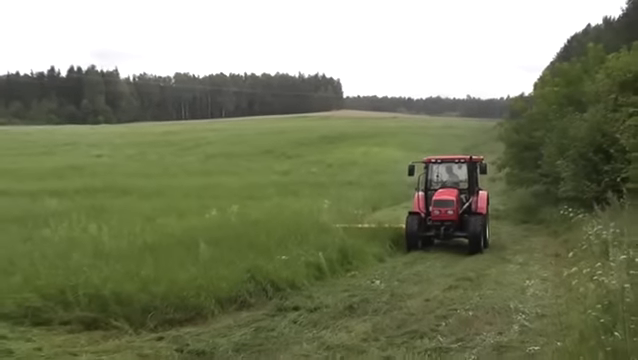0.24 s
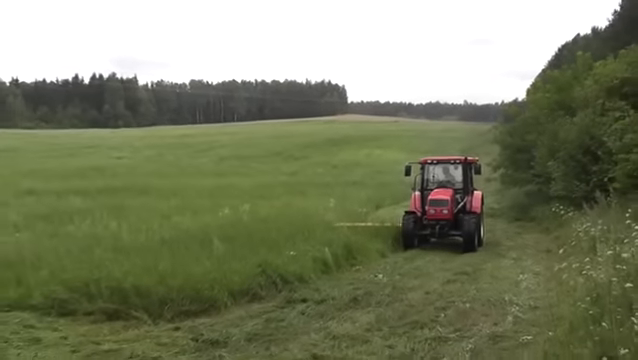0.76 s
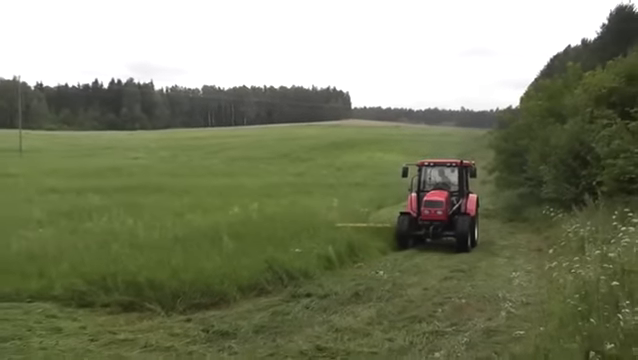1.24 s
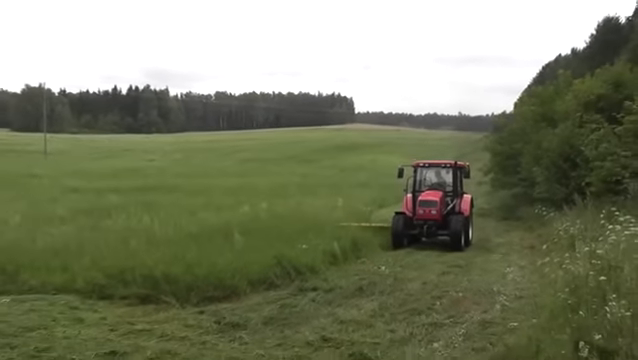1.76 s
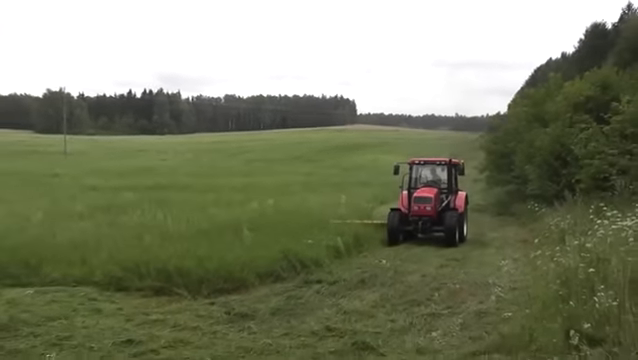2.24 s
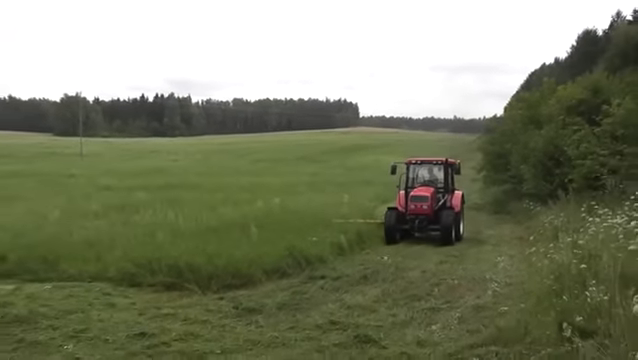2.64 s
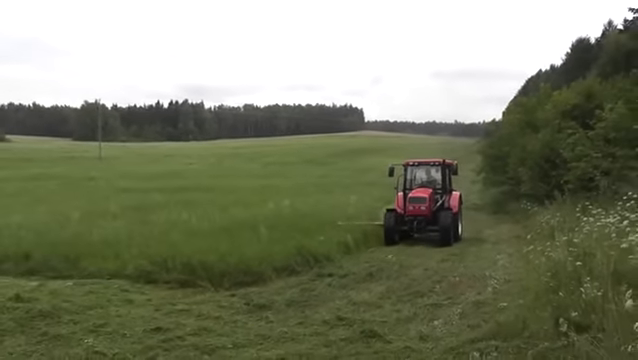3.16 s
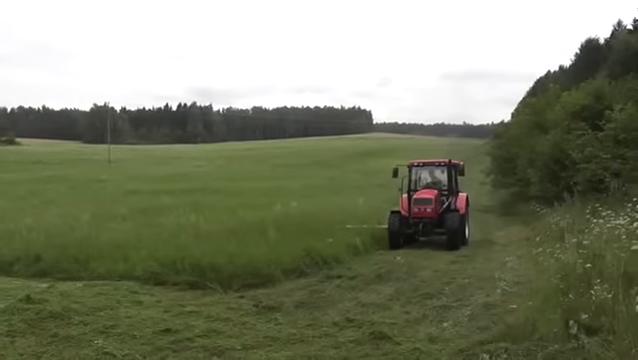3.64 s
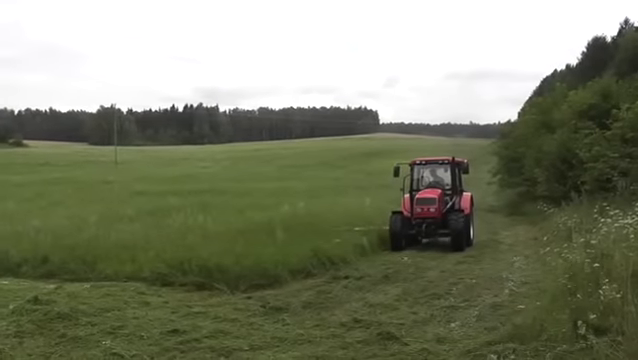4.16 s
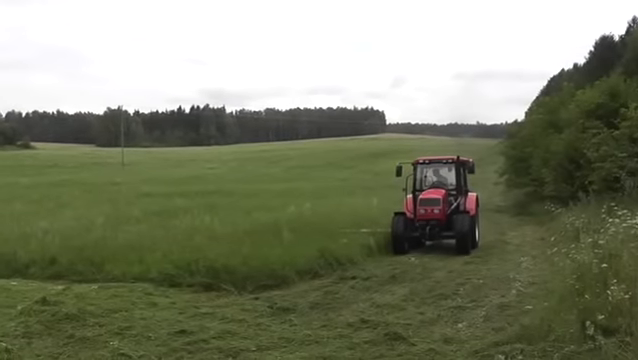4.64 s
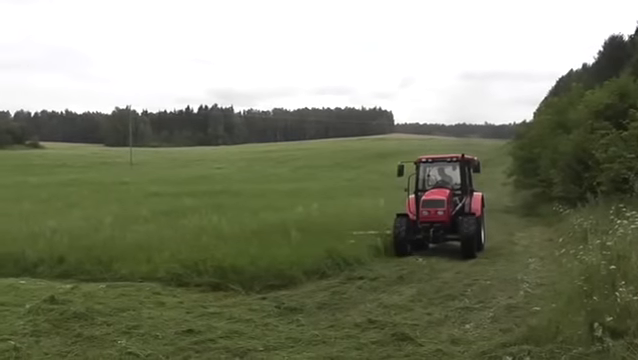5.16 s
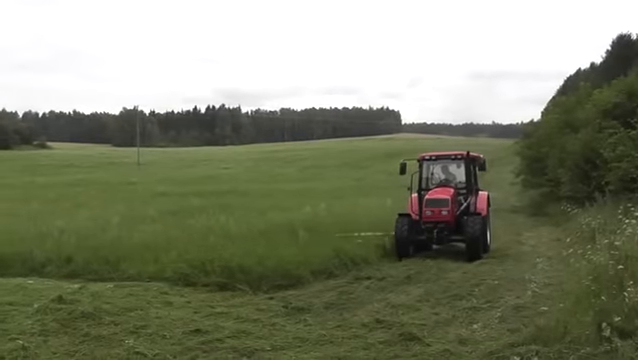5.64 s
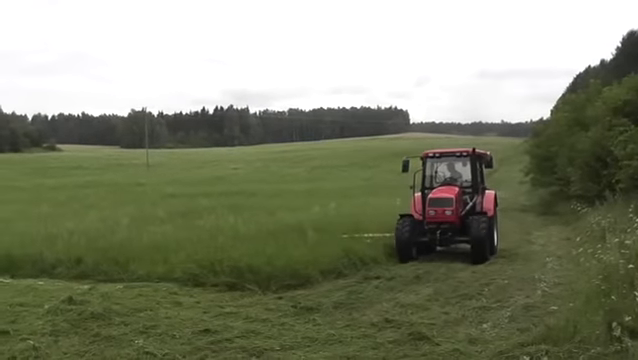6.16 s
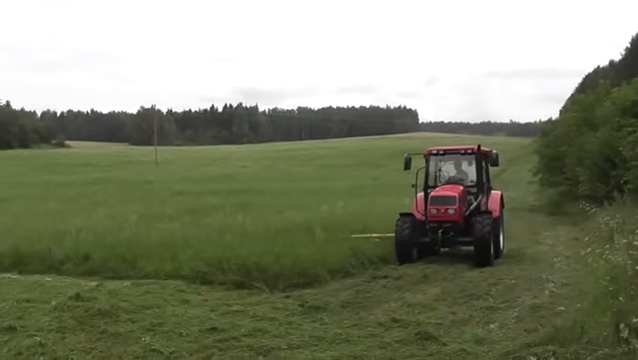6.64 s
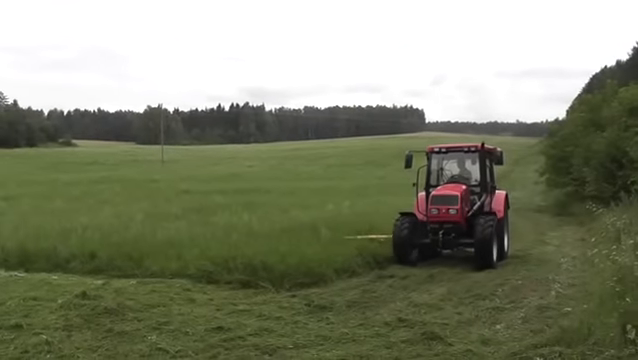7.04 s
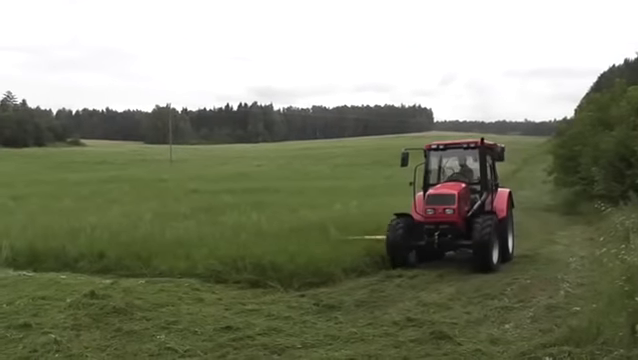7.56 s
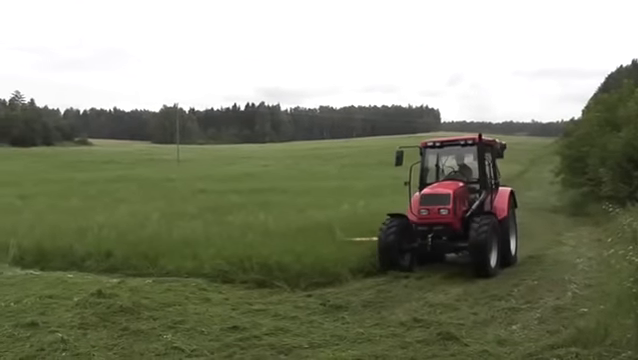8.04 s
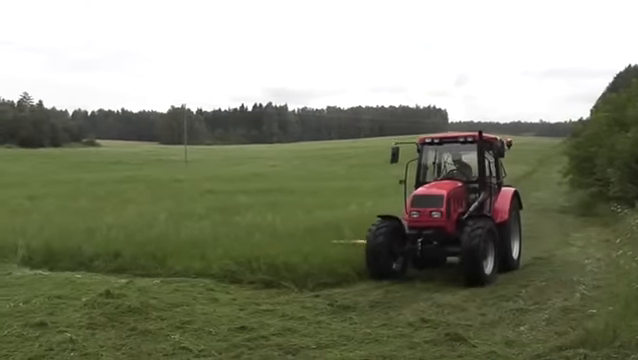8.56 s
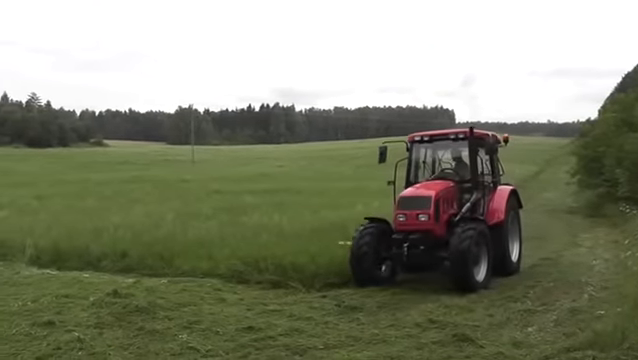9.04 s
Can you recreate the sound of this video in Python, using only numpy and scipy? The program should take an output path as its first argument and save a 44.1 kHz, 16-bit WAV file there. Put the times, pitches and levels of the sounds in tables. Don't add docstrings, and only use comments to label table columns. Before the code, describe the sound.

Continuous farm machinery outdoors: a humming, buzzing mower whine with coarse airy hiss, plus a four-cylinder diesel's exhaust drone, rattling knock and fine high belt chirps. The tractor comes from moderate distance to close by; the hiss swells mid-way then thins, while engine clatter and low roar grow. One soft rising note passes just before six seconds. Single open-air microphone, no echo, gently overloaded.

```python
import sys
import numpy as np
from scipy import signal
from scipy.fft import rfft, irfft
from scipy.io import wavfile

SR = 44100
rng = np.random.default_rng(int(sys.argv[2]) if len(sys.argv) > 2 else 0)


def wav_out(sig):
    wavfile.write(sys.argv[1], SR, np.round(np.clip(np.atleast_2d(sig).T, -1, 1) * 32767).astype(np.int16))


def elevation(decibels):
    levels = np.asarray(decibels, float)
    return 10 ** (levels / 20)


N = 410123
TIME = np.arange(N) / SR


def rms_one(x):
    return x / np.sqrt(np.mean(x ** 2) + 1e-20)


def in_time(rows):
    s, *columns = np.transpose(rows)
    return [np.interp(TIME, s, c) for c in columns]


def at_hz(points, hz):
    point_hz, point_db = np.array(points).T
    return np.interp(np.log(hz), np.log(point_hz), point_db)


def drift(rate_hz):
    pole = np.exp(-80 * np.pi * rate_hz / SR)
    white = rng.standard_normal(N // 40 + 2002)
    slow = signal.lfilter([1], [1, -2 * pole, pole * pole], white)[2000:]
    return np.interp(np.arange(N) / 40, np.arange(len(slow)), rms_one(slow - slow.mean()))


def band(x, low_hz, high_hz, order=2):
    return signal.sosfilt(signal.butter(order, [low_hz, high_hz], "band", fs=SR, output="sos"), x)


def coloured(spectrum, dips=()):
    hz = np.maximum(np.fft.rfftfreq(N + 1, 1 / SR), 1)
    inside = (hz > .8 * spectrum[0][0]) & (hz < 1.05 * spectrum[-1][0])
    db = at_hz(spectrum, hz)
    for centre_hz, half_width_hz, depth_db in dips:
        db = db + depth_db * np.exp(-((hz - centre_hz) / half_width_hz) ** 2)
    return rms_one(irfft(rfft(rng.standard_normal(N + 1)) * elevation(db) * inside, N + 1)[:N])


def tone(turns, level_db):
    return np.sqrt(2) * elevation(level_db) * np.cos(2 * np.pi * turns)


# start_s, level_db [dB rms]
WHINE = [(0.0, -14), (0.07, -14.5), (3.0, -16), (3.21, -18), (3.83, -14.5), (4.32, -19.5), (4.82, -15.5),
         (4.9, -18), (5.49, -13.5), (6.19, -17), (6.29, -13), (6.35, -16.5), (7.35, -13), (7.85, -18),
         (8.34, -16), (8.42, -18.5), (9.17, -17), (9.3, -22)]
# multiple [of the pass rate], far_db, near_db [dB rms]
BLADE_HARMONICS = [(3, -51, -41), (4, -38, -36.5), (5, -59, -29.5), (6, -43, -44.5), (7, -53, -38),
                   (8, -42.0, -44), (9, -41, -51), (10, -39, -47), (11, -41.5, -46.5), (12, -40, -45.5),
                   (13, -55, -48), (14, -38.5, -56), (15, -36.5, -45), (16, -45.5, -37.5), (17, -45, -33.5),
                   (18, -43, -45.5), (19, -42, -55), (20, -46, -50.5), (21, -42.0, -58.5), (22, -43.5, -40),
                   (23, -47.5, -45.5), (24, -48.5, -52), (25, -39, -49.5), (26, -44, -51.5),
                   (27, -41.5, -56.0), (28, -54.5, -53.5), (29, -55.5, -56), (30, -51.5, -54.5),
                   (31, -39, -58), (32, -47, -46.5)]
# centre_s, multiple, half_width_s, gain_db
SWELLS = [(0.4, 6.0, 0.43, 9), (0.7, 17.0, 1.05, 6), (1.0, 36, 1.6, 5.5), (1.5, 5.0, 0.41, 15.5),
          (1.5, 31, 1.9, -6), (2.0, 3.0, 1.6, 10.5), (3.2, 25.0, 1.13, 4.5), (3.3, 4.0, 1.1, 1.5),
          (3.5, 17.0, 0.39, 7), (3.5, 20.0, 2.6, 9.5), (3.6, 37, 1.8, 6.5), (4.2, 6.0, 1.2, 5),
          (4.2, 8.0, 2.3, 4.5), (4.2, 16.0, 1.23, 5.5), (4.4, 11.0, 0.33, 7), (4.6, 9.0, 2.4, 7),
          (4.8, 10.0, 0.92, 9), (5.3, 5.0, 0.71, 11), (5.7, 27.0, 2.5, 9.5), (6.1, 21.0, 2.4, 15),
          (6.3, 20.0, 0.71, 9.5), (6.4, 16.0, 1.3, 7.5), (6.6, 11.0, 0.66, 9.5), (6.6, 12.0, 0.74, 8),
          (6.9, 13.0, 1.87, 8.5), (7.1, 19.0, 0.82, 12.5), (7.6, 18.0, 0.22, 11.5), (8.6, 40, 1.0, 8),
          (9.0, 5.0, 0.32, 3.5), (9.1, 6.0, 1.27, 14.5)]


def blades(passes, pass_hz, bright_db):
    second_db, = in_time(WHINE)
    along = TIME / TIME[-1]
    first_db = -20.5 + 1.5 * along - .15 * (second_db - second_db.mean())
    flutter_db = 0.45 * drift(16)
    out = tone(passes + .4, first_db + flutter_db)
    out += tone(2 * passes + .41, second_db + flutter_db + .5 * drift(5))

    levels = {round(k): far_db + (near_db - far_db) * along for k, far_db, near_db in BLADE_HARMONICS}
    for k in range(33, 60):
        levels[k] = at_hz(HISS_FAR, k * pass_hz.mean()) - 43 + bright_db
    for centre_s, k, half_width_s, gain_db in SWELLS:
        levels[round(k)] = levels[round(k)] + gain_db * np.exp(-((TIME - centre_s) / half_width_s) ** 2)
    for k in range(3, 60):
        turns = k * (passes - .27) + 0.2 * drift(0.45) + 0.032 * drift(5)
        out += tone(turns, levels[k] + (.4 + .05 * k) * drift(.9) + 1.2 * drift(6))
    return out


# pitch_hz [Hz], density_db [dB per Hz]
HISS_FAR = [(560, -25.5), (950, -5.5), (1020, -8), (1160, -13), (1220, -6), (1390, -3), (1720, 0.5),
            (2010, -4), (2370, 2.5), (2820, -0.5), (3260, 1), (4450, -7), (6380, -4), (8210, -11.5),
            (9680, -30), (12600, -51.5), (21300, -120)]
HISS_TURN = [(560, -36.5), (950, -8.5), (1270, -8.5), (1680, -1.5), (2050, -3), (2460, 1.5), (3230, -2.5),
             (3660, -7), (4040, -6), (4410, -10), (6440, -6.5), (8130, -12), (9680, -31), (12600, -66),
             (21300, -120)]
HISS_NEAR = [(560, -37), (950, -0.5), (1110, -21.5), (1360, -2), (1800, -5.5), (2030, -4), (2440, 0.5),
             (4490, -11.5), (5460, -7), (6130, -6.5), (7090, -5.5), (8450, -12), (9680, -28),
             (12600, -61.5), (21300, -120)]
# pitch_hz, half_width_hz, depth_db
GROUND_DIPS = [(1980, 91, -4), (2840, 50, -5.5), (3630, 150, -3.5), (4430, 130, -3.5), (5200, 250, -3.5),
               (6900, 140, -6)]


def hiss(passes, hiss_db, bright_db, shares):
    strength = elevation(3.7 * rng.standard_normal(int(passes[-1]) + 2))[(passes + .23).astype(int)]
    puff = strength * np.cos(np.pi * (passes - .27)) ** 4
    noise = np.sqrt(shares[0] + shares[1]) * coloured(HISS_FAR, GROUND_DIPS)
    noise += np.sqrt(shares[2]) * coloured(HISS_TURN, GROUND_DIPS)
    noise += np.sqrt(shares[3]) * coloured(HISS_NEAR, GROUND_DIPS)
    top = signal.sosfilt(signal.butter(2, 6500, "high", fs=SR, output="sos"), noise)
    treble_gain = elevation(bright_db - 0.5 + .8 * drift(7.3)) * (1 + 0.62 * puff)
    level = elevation(hiss_db - 2.5 + 0.73 * drift(13) + 0.41 * drift(30))
    return level * (1 + 0.25 * puff) * (noise + (treble_gain - 1) * top)


# multiple [of the firing rate], level_db [dB rms]
FIRING_ORDERS = [(1, -40.5), (2, -28), (3, -30.5), (4, -47.5), (5, -45)]
# multiple [of the firing rate], level_db [dB rms]
UNEVEN_ORDERS = [(1.25, -60), (1.5, -53), (1.75, -52.5), (2.25, -54), (2.5, -51), (2.75, -43), (3.25, -49),
                 (3.5, -47), (3.75, -50), (4.25, -50.5), (4.5, -46), (4.75, -47.5), (5.25, -61),
                 (5.5, -56.5)]


def exhaust(firings):
    pulse = firings - .223
    out = np.zeros(N)
    for k, level_db in FIRING_ORDERS:
        out += tone(k * pulse + .08, level_db + .5 * drift(3))
    for k, level_db in UNEVEN_ORDERS:
        turns = k * firings + rng.random() + 0.043 * drift(.4)
        out += tone(turns, level_db + 0.5 * drift(2.0))
    return out


# place [0-1 of the cycle], level_db
KNOCKS = [(.178, -6.5), (.238, -5), (.44, 0), (.515, -11), (.55, -15), (.70, -10), (.755, -10.5),
          (.965, -9), (.008, -10.5)]
# start_s, ring_low_hz, ring_high_hz, ring_db, clatter_db
STAGES = [
    (1.5, 620, 880, -2.5, -14),
    (4.2, 610, 830, -2.5, -14),
    (6.6, 545, 760, -2.5, -14),
    (8.9, 540, 960, -5.5, -15),
]


def stage_shares():
    return [np.interp(TIME, [row[0] for row in STAGES], one) for one in np.eye(len(STAGES))]


def knock(firings, knock_db, shares):
    cycles = np.arange(int(firings[-1] / 4) + 1)
    clicks = np.full(N + 1, 1e-18)
    for place, level_db in KNOCKS:
        luck = rng.standard_normal((len(cycles), 2))
        at = np.searchsorted(firings / 4, cycles + place + .002 * luck[:, 0])
        clicks[at] -= elevation(level_db + .8 * luck[:, 1])
    clicks = clicks[:N]
    fade = np.exp(-1 / (0.0068 * SR))
    bursts = signal.lfilter([1], [1, -fade], np.abs(clicks) ** .5) * rng.standard_normal(N)

    ticks = np.exp(-((firings + .1) % 1) / .22) * rng.standard_normal(N)
    out = elevation(-16.5 + 7 * TIME / TIME[-1]) * rms_one(band(ticks, 1055, 1960))
    for share, (_, low_hz, high_hz, ring_db, clatter_db) in zip(shares, STAGES):
        out += share * elevation(ring_db) * rms_one(band(clicks, low_hz, high_hz, order=3))
        out += share * elevation(clatter_db) * rms_one(band(bursts, low_hz, high_hz))
    return elevation(knock_db) * out


# start_s, level_db [chirp]
BELT_SLIP = [(0, -36), (.5, -42), (1.2, -33), (2.4, -30), (2.75, -47.5), (4.3, -40), (4.7, -38.5),
             (5.6, -29.5), (6.3, -34.5), (6.75, -32.5), (7.05, -33.5), (7.5, -32.5), (7.8, -27.5),
             (8.13, -23.5), (8.4, -28), (8.65, -25.5), (9.3, -27.5)]
REGRIP_S = [-.1, 1.05, 2.5, 3.68, 4.9, 6.6, 7.5, 7.93, 8.35, 8.79, 9.33]


def belt(firings):
    chirp_db, = in_time(BELT_SLIP)
    laps = np.interp(TIME, REGRIP_S, np.arange(len(REGRIP_S)))
    lap = signal.sawtooth(2 * np.pi * laps, .75)
    lean_db = -1.5 + 5.5 * lap + 1.0 * drift(3.3)
    stroke, count = (firings + .09) % 1, (firings + .09).astype(int)
    luck = rng.standard_normal((count[-1] + 1, 2))[count]
    attack = np.clip(stroke / .07, 0, 1)
    shape = attack * np.cos(np.pi / 2 * np.clip((stroke - .24) / .24, 0, 1)) ** 2
    lean = elevation(lean_db * np.clip((stroke - .19) / 0.066, -.7, .7))
    pitch_hz = 5450 + (1400 + 90 * luck[:, 0]) * np.exp(-stroke / .27)
    hoarse = 1 + .25 * rms_one(band(rng.standard_normal(N), 100, 450))
    chirps = shape * lean * hoarse * np.cos(2 * np.pi * np.cumsum(pitch_hz) / SR)

    lag = SR * (.00169 + .000025 * lap + .00001 * drift(1.5))
    chirps += .55 * np.interp(np.arange(N) - lag, np.arange(N), chirps)
    level_db = chirp_db + .3 + 2.2 * np.minimum(lap + .4, .4) + 1.3 * luck[:, 1]
    return elevation(level_db) * rms_one(band(chirps, 5620, 7200, order=4))


# start_s, from_hz, to_hz, length_s, level_db
THUD = (5.91, 405, 465, .09, -31)


def thud():
    start_s, from_hz, to_hz, length_s, level_db = THUD
    along = np.clip((TIME - start_s) / length_s, 0, 1)
    turns = np.cumsum(from_hz + (to_hz - from_hz) * along) / SR
    return np.sin(np.pi * along) * tone(turns, level_db)


# pitch_hz [Hz], density_db [dB per Hz]
RUMBLE = [(25, -15), (60, -20.5), (85, -7), (130, -5), (200, -6), (300, -2.5), (430, -8.5), (540, -4),
          (700, -3), (900, -8), (1100, -23)]
# pitch_hz [Hz], density_db [dB per Hz]
GROUND_ROAR = [(300, -4.5), (380, 12), (520, 1.5), (700, -18), (950, -4), (1150, -18.5)]


def rumble():
    near = np.clip((TIME - 3.1) / (8.65 - 3.1), 0, 1)
    return elevation(-30.5) * coloured(RUMBLE) + elevation(-31) * near ** 2 * coloured(GROUND_ROAR)


# start_s, firing_hz [firings per s], pass_hz [blade passes per s]
SPEED = [(0.0, 50.226, 155.713), (0.547, 50.44, 156.395), (1.094, 50.574, 156.589),
         (1.641, 50.914, 157.811), (2.188, 50.896, 157.697), (2.735, 50.823, 157.724),
         (3.282, 50.552, 156.579), (3.829, 50.172, 155.9), (4.376, 49.966, 154.839),
         (4.924, 49.758, 154.253), (5.471, 49.238, 152.665), (6.018, 48.834, 151.358),
         (6.565, 48.593, 150.828), (7.112, 48.132, 149.347), (7.659, 47.866, 148.761),
         (8.206, 47.628, 147.784), (8.753, 47.58, 147.24), (9.3, 47.624, 148.074)]
# start_s, level_db [over the mean]
SWATH = [(0, -1.5), (.9, 0.5), (1.9, -1), (2.5, -0.5), (2.9, -1), (3.3, 1), (3.6, -0.5), (4.2, 3.5),
         (5.1, 2.5), (5.45, 0.5), (5.75, 0), (6.2, 0.5), (7.2, -0.5), (8.3, -2.5), (9.0, -7.5), (9.3, -9.5)]
# start_s, level_db [knock]
EFFORT = [(0, -25.5), (1.0, -24.5), (1.9, -24), (2.7, -24.5), (3.2, -22), (4.0, -26.5), (5.0, -22),
          (6.0, -24), (7.0, -24), (8.3, -23), (9.3, -24)]


def scene():
    firing_hz, pass_hz = in_time(SPEED)
    firings, passes = np.cumsum(firing_hz) / SR, np.cumsum(pass_hz) / SR
    bright_db, = in_time(SWATH)
    shares = stage_shares()
    hiss_db = -22.5 + 0.34 * bright_db - 0.5 * shares[-1]
    knock_db = in_time(EFFORT)[0] + 0.87 * drift(1.0)
    mower = blades(passes, pass_hz, bright_db) + hiss(passes, hiss_db, bright_db, shares) + thud()
    engine = exhaust(firings) + knock(firings, knock_db, shares) + belt(firings)
    return (mower + engine + rumble())[None]


def low_pass(x):
    return signal.sosfilt(signal.butter(12, 14450, fs=SR, output="sos"), x)


# pitch_hz, level_db
MIRROR = [(12000, -11), (12500, -15.5), (13000, -23), (14000, -40.5), (14450, -59.5)]


def record(dry):
    soft = 1.413 * np.tanh(dry[0] / 1.376)
    hz = np.fft.rfftfreq(2 * N, 1 / SR)
    there_and_back = np.r_[soft, soft[::-1]]
    kept = rfft(there_and_back) * (hz < 10040) * (hz > 8)
    image = np.conj(kept[::-1]) * elevation(at_hz(MIRROR, hz + 1)) * (hz < MIRROR[-1][0])
    heard = irfft(kept + image)[None, :N]
    return low_pass(heard)


dry = scene()
out = record(dry)
wav_out(out)
```